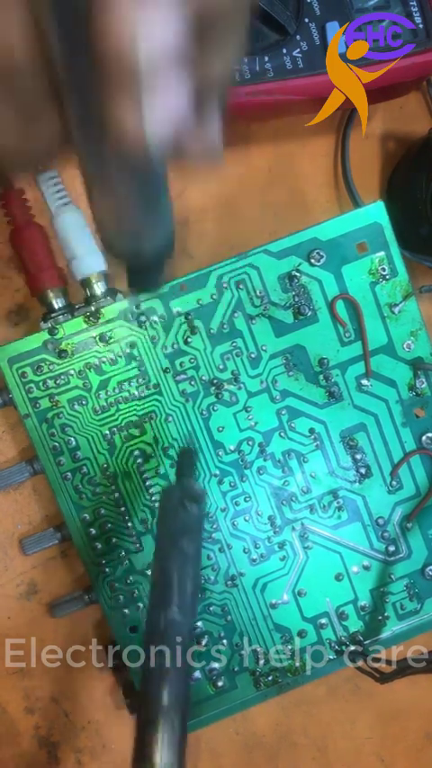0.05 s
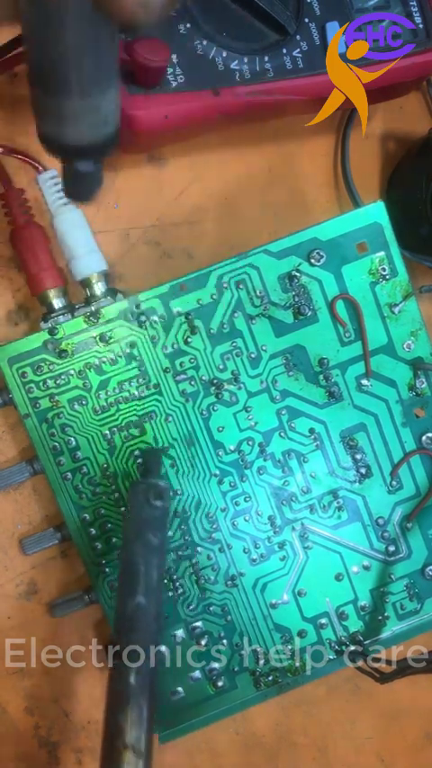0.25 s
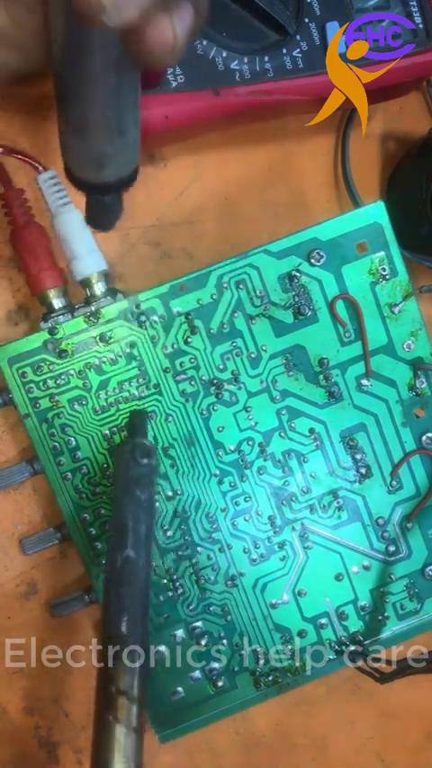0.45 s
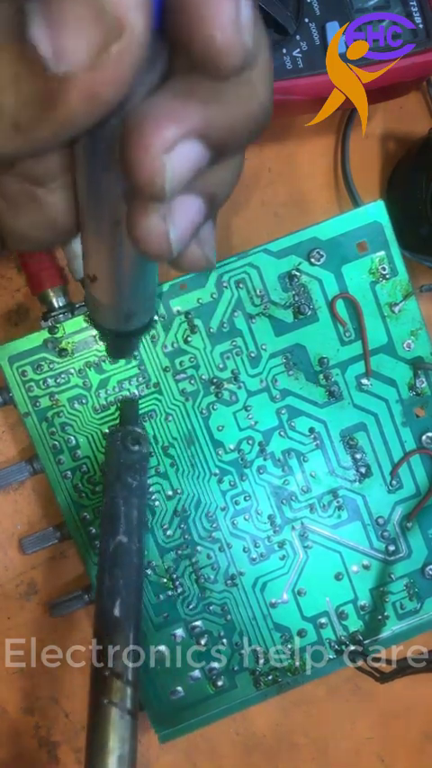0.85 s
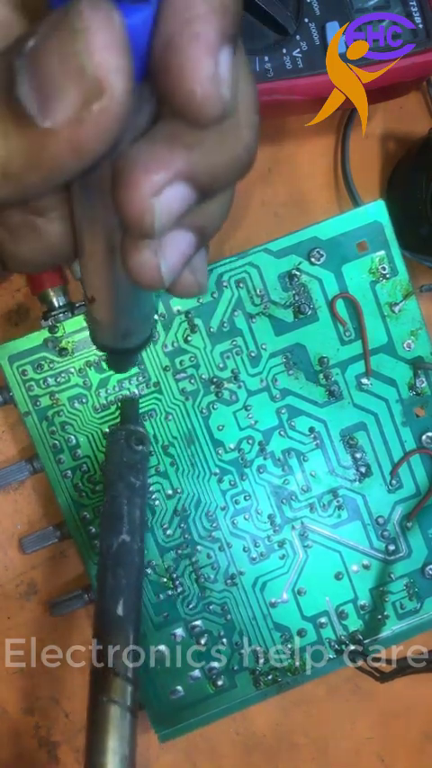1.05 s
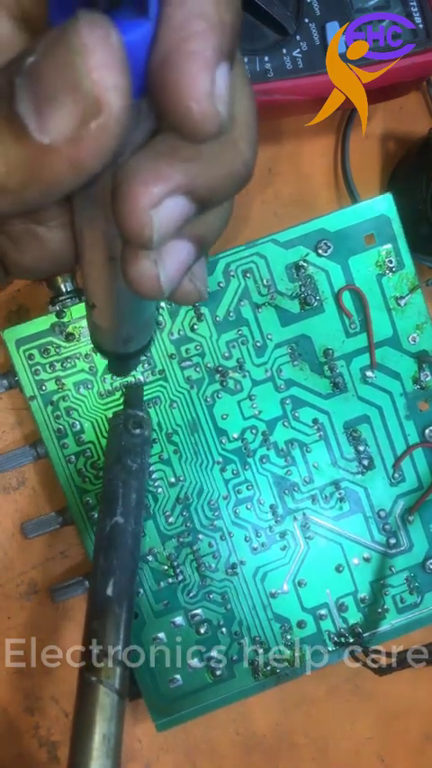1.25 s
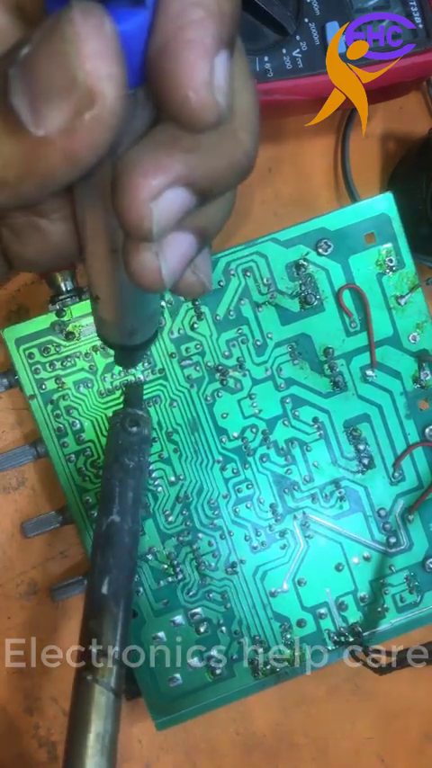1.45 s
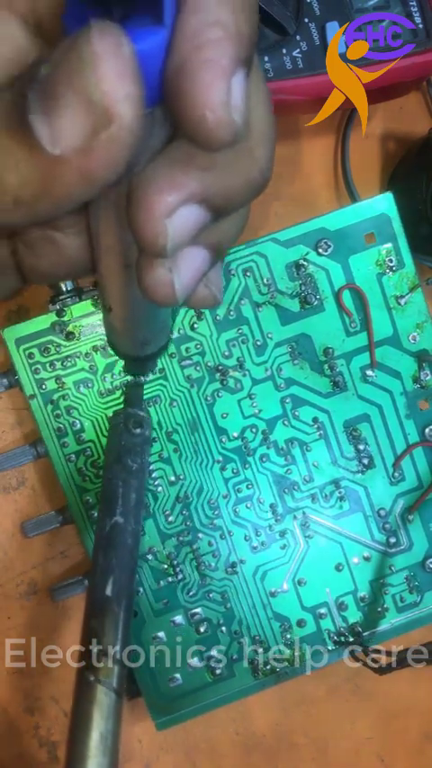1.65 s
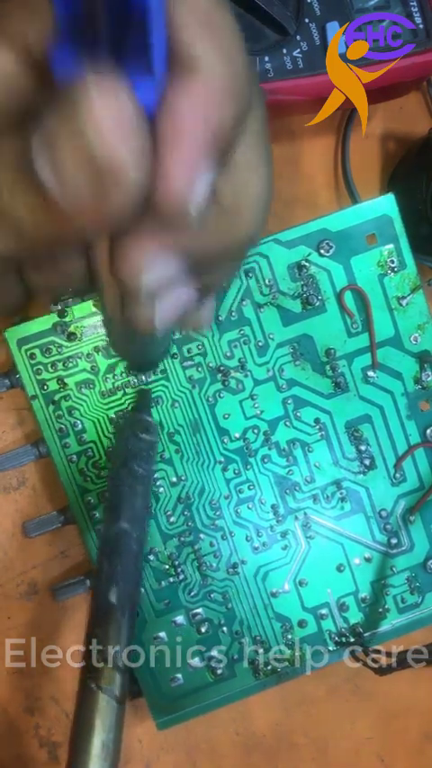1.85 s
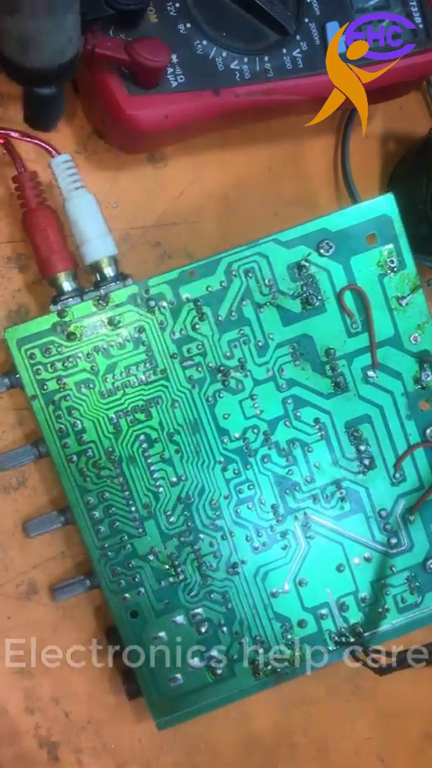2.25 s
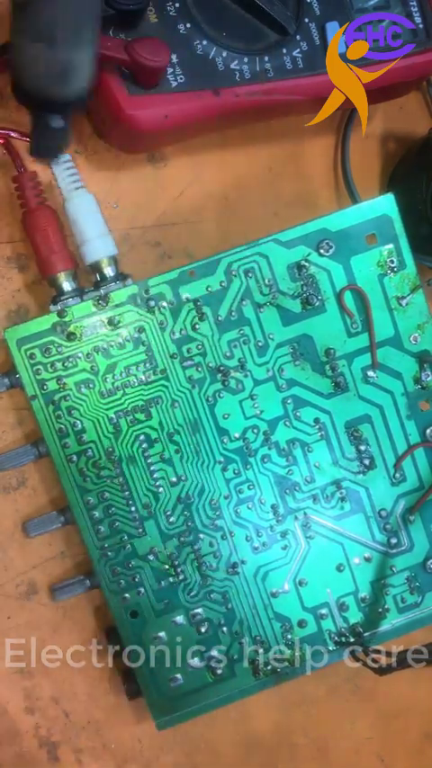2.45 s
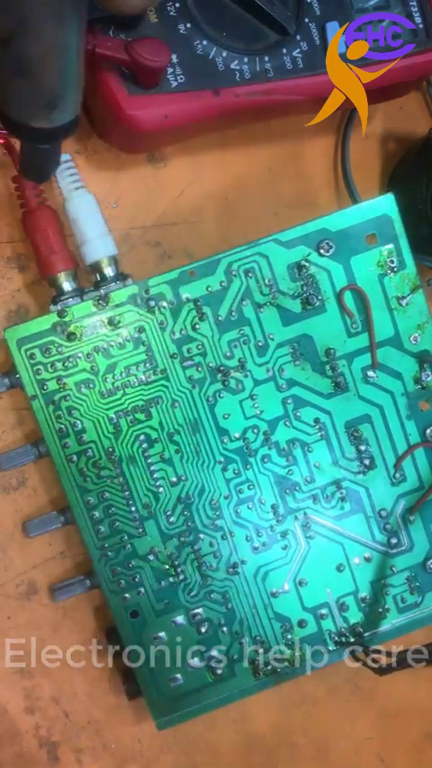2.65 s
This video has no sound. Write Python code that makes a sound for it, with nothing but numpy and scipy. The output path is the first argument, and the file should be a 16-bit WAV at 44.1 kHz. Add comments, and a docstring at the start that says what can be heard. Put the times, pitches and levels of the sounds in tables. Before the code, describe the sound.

Two sharp clacks of a desoldering pump on a bench, over faint room noise.

```python
"""Faint, dull room noise in a small workshop, then sharp clicks close to the microphone: a spring-loaded
desoldering pump is cocked against the workbench. Plunger and catch snap, the spring rattles, the plunger
scrapes along the barrel, and each blow rings and thumps the bench top. Fingers shift their grip, and
two seconds later the pump is knocked on the bench again. The recorder's automatic gain lifts the
background after the blows; its gate briefly ducks it, then shuts it off."""
import sys
import numpy as np
from scipy import signal
from scipy.fft import rfft, irfft
from scipy.io import wavfile
from scipy.ndimage import uniform_filter1d

SR = 44100
rng = np.random.default_rng(int(sys.argv[2]) if len(sys.argv) > 2 else 0)


def master_out(mix):
    """Clip the mix to full scale and print it as 16-bit PCM to the path in sys.argv[1]."""
    frames = np.transpose(np.atleast_2d(mix))
    ceiling = np.clip(frames, -1, 1)
    pcm = np.round(ceiling * 32767).astype(np.int16)
    wavfile.write(sys.argv[1], SR, pcm)


N = 123479
T = np.arange(N) / SR
BINS_HZ = np.maximum(np.fft.rfftfreq(N, 1 / SR), 1)


def undb(db):
    """Decibels to gain."""
    return 10 ** (np.asarray(db) / 20)


def unit(x):
    """Scale to rms 1."""
    return x / np.sqrt(np.mean(x ** 2))


def curve(points):
    """Gain over time from (time_s, level_db) points."""
    return undb(np.interp(T, *np.array(points).T))


def colour(points, tilt_db=0, pivot_hz=2800):
    """Gain per bin from (frequency_hz, level_db) points, the treble tilted by tilt_db per octave."""
    hz, db = np.array(points).T
    shape_db = np.interp(np.log2(BINS_HZ), np.log2(hz), db)
    return undb(shape_db + tilt_db * np.maximum(np.log2(BINS_HZ / pivot_hz), -.5))


def band(hz, octaves):
    """Bell-shaped gain per frequency bin."""
    return np.exp(-.5 * (np.log2(BINS_HZ / hz) / octaves) ** 2)


def noise(gain):
    """Noise of a given colour, rms 1."""
    return unit(irfft(rfft(rng.standard_normal(N)) * gain, N))


def wander(per_s):
    """Glide between random values, per_s of them a second; spread near 1."""
    hold = int(SR / per_s)
    steps = np.repeat(rng.standard_normal(N // hold + 1), hold)
    return 1.2 * uniform_filter1d(steps, hold)[:N]


def impulse(gain):
    """The shortest causal click of a given colour, peak 1."""
    cepstrum = irfft(np.log(gain), N)
    cepstrum[1:] *= 2 * (np.arange(1, N) < N / 2)  # minimum phase
    click = irfft(np.exp(rfft(cepstrum)), N)
    return click / np.abs(click).max()


def fade(t60):
    """Exponential decay, 60 dB in t60 seconds."""
    return np.exp(-np.minimum(np.log(1000) * T / t60, 40))


def ring(modes):
    """A tenth of the scene's length of decaying (pitch_hz, level_db, t60_s) modes, then silence."""
    t = T[:N // 10]
    tones = sum(undb(db) * np.sin(2 * np.pi * hz * t) * np.exp(-np.log(1000) * t / t60)
                for hz, db, t60 in modes)
    return np.pad(tones, (0, N - len(t)))


def add(out, start_s, sound):
    """Mix a sound in from a given time."""
    start = int(start_s * SR)
    out[start:] += sound[:N - start]


def suppressor_patches(x, depth, swing_db=6):
    """A noise suppressor's trace: narrow bands swell and sink at random, by depth (0-1 over time)."""
    _, frames_s, cells = signal.stft(x, SR, nperseg=1024)
    chance = uniform_filter1d(rng.standard_normal(cells.shape), size=4, axis=0)
    chance = unit(uniform_filter1d(chance, size=2, axis=1))
    gain = undb(swing_db * np.interp(frames_s, T, depth) * np.minimum(chance, 1))
    gain /= np.sqrt(np.mean(gain ** 2, axis=0))
    return signal.istft(cells * gain, SR)[1][:N]


# spectrum of the room behind the bench: frequency_hz, level_db
ROOM_SPECTRUM = [(24, -54), (40, -26.5), (96, -6.5), (168, -1), (490, -7), (675, -14), (1100, -8.5),
                 (1320, -16), (1810, -17.5), (2710, -27), (6490, -42), (7600, -50.5), (8300, -80)]
# background as the recorder's automatic gain lifts it and its gate finally shuts: time_s, level_db
RECORDER_GAIN = [(0, -54.5), (.22, -52), (.44, -45.5), (.7, -50), (1.0, -55), (1.42, -54.5), (1.6, -52.5),
                 (1.72, -54), (2.21, -55), (2.3, -49), (2.62, -49.5), (2.638, -80)]
# brief drop-outs of the gate: start_s, end_s, gain_db
GATE_DROPOUTS = [(0.343, 0.425, -15), (2.214, 2.25, -29), (2.474, 2.506, -31), (2.519, 2.548, -13)]
# treble let through by the noise suppressor: time_s, gain_db
SUPPRESSOR_TREBLE = [(.3, -1.5), (.39, -18.5), (.55, -1.5), (2.2, 1), (2.36, -17), (2.46, -1.5),
                     (2.54, -11.5)]


def room_noise(treble_hz=3640, flicker_db=2.5, flicker_per_s=23, gate_edge_s=.0087):
    """A dull room rush; a noise suppressor dulls its treble and leaves watery patches after the blows."""
    spectrum = rfft(noise(colour(ROOM_SPECTRUM)))
    rush = np.zeros(N)
    for hz in 30 * 2 ** np.arange(0, 9, .5):  # half-octave bands
        flicker = undb(flicker_db * wander(flicker_per_s) / (1 + (hz / treble_hz) ** 2))
        rush += irfft(spectrum * band(hz, octaves=.25), N) * flicker
    rush = unit(rush)
    low = signal.sosfiltfilt(signal.butter(6, treble_hz, fs=SR, output="sos"), rush)
    treble = curve(SUPPRESSOR_TREBLE)
    rush = suppressor_patches(low + (rush - low) * treble, depth=np.clip(1 - treble, 0, 1))
    gate_db = sum(db * np.clip(np.minimum(T - start, end - T) / gate_edge_s, 0, 1)
                  for start, end, db in GATE_DROPOUTS)
    return rush * curve(RECORDER_GAIN) * undb(gate_db)


# modes of the pump barrel: pitch_hz, level_db, t60_s
BARREL_MODES = [(2800, -4.5, 0.038), (2950, -1.5, 0.03), (3210, -1.5, 0.035), (3350, -5.5, 0.035),
                (4330, -4.5, 0.052), (4980, -13, 0.062), (6340, -15, .05)]
# spectrum of one snap: frequency_hz, level_db
SNAP_SPECTRUM = [(200, -18), (1100, -15), (2000, -22), (2450, -9), (2950, 1), (3500, -3), (4400, -15.5),
                 (5800, -25), (6900, -22), (7650, -26.5), (9300, -62.5)]
# resonances of the tube, heard in every rattle and scrape: frequency_hz, level_db
TUBE_SPECTRUM = [(300, -16.5), (1100, -11), (2100, -23), (2500, -9), (2870, 1.5), (3130, 3), (3550, -8.5),
                 (3950, -8.5), (4300, -1.5), (4680, -19), (5030, -6.5), (5950, -29.5), (6420, -12.5),
                 (6950, -25), (7650, -28.5), (9300, -67)]
# contacts close to the microphone: start_s, snap_db, rattle_db, rattle_t60_s, tilt_db_per_octave
PUMP_CONTACTS = [(0.1467, -44, -55.5, 0.18, 2), (0.1813, -40.5, -55.5, 0.1, 5),
                 (0.2169, -35.5, -48.5, 0.039, 11), (0.2249, -23.5, -29, 0.069, 6),
                 (.2330, -5.5, -27.5, 0.024, -0.5), (0.2417, -24, -33.5, 0.04, 3.5),
                 (0.2489, -23, -33, 0.021, 3), (0.2642, -18.5, -23.5, 0.03145, -7),
                 (0.3222, -24.5, -24.5, 0.016, 9), (0.3321, -25, -32.5, 0.032, 0),
                 (2.2461, -32, -36, .04, -0.5), (2.2534, -4.5, -26.5, 0.044, -3.5),
                 (2.2614, -20, -30, 0.05, -9.5), (2.2698, -26, -36.5, 0.029, -4),
                 (2.2771, -39, -36, 0.078, -4), (2.5070, -36, -55, 0.029, 2.5),
                 (2.5140, -34, -40.5, 0.038, -10), (2.7142, -35, -72, .015, -0.5)]


def pump_clicks(barrel_db=-12.5):
    """Each contact of plunger and catch snaps, rings the barrel and rattles the spring in the tube."""
    out = np.zeros(N)
    barrel = undb(barrel_db) * ring(BARREL_MODES)  # level relative to the rattle
    for start, snap_db, rattle_db, t60, tilt_db in PUMP_CONTACTS:
        snap = impulse(colour(SNAP_SPECTRUM, tilt_db))
        rattle = noise(colour(TUBE_SPECTRUM, tilt_db)) * fade(t60)
        add(out, start, undb(snap_db) * snap + undb(rattle_db) * (rattle + barrel))
    return out


# modes of the bench top: pitch_hz, level_db, t60_s
BENCH_MODES = [(186, 2, 0.051), (265, 3, .05), (394, 3.5, 0.04), (609, -2, 0.038), (816, -6.5, 0.085),
               (908, -8.5, 0.059), (1109, 0, 0.058), (1167, -7, 0.055), (1490, -5, 0.078),
               (1727, -6, 0.076), (1889, -8, 0.094)]
# blows on the bench, close by: start_s, level_db, centre_hz, spread_octaves, ring_time_factor
BENCH_BLOWS = [(0.18, -31, 876, 0.46, 2.55), (0.2343, -15.5, 398, 0.68, 1.04),
               (0.2424, -17.5, 647, 1.2, 0.33), (0.2632, -15, 916.5, 0.86, 0.44),
               (0.3231, -18.5, 810, 0.76, 0.67), (2.2470, -33, 1313, 1.7, .9),
               (2.2540, -12.5, 301.5, 1.9, 1.06), (2.2756, -20, 1434, 0.72, 0.6),
               (2.5115, -26.5, 615, 0.19, 0.97), (2.515, -32, 1105, 0.13, 0.44),
               (2.583, -42, 740, .2, 0.93), (2.7151, -44, 375, 1.02, 0.32)]


def bench_knocks(rise_s=.0007, mode_scatter=.0041, clatter_db=-16, clatter_t60_s=.11):
    """Each blow rings the bench modes around its own centre pitch, and things on the bench clatter."""
    out = np.zeros(N)
    top_mode_hz = BENCH_MODES[-1][0]
    for start, db, centre_hz, spread, ring_factor in BENCH_BLOWS:
        def excitation(hz):
            return 1 / (1 + (np.log2(hz / centre_hz) / spread) ** 2) / (1 + (hz / top_mode_hz) ** 4)

        board = np.zeros(N)
        for k, (hz, mode_db, t60) in enumerate(BENCH_MODES):
            detuned_hz = hz * (1 + mode_scatter * rng.standard_normal())
            mode = ring([(detuned_hz, mode_db, t60 * ring_factor)])
            board += (-1) ** k * excitation(hz) * mode  # neighbouring modes move in opposite directions
        clatter = undb(clatter_db) * noise(excitation(BINS_HZ)) * fade(clatter_t60_s * ring_factor)
        attack = 1 - np.exp(-T / rise_s)
        add(out, start, undb(db) * (board / np.abs(board).max() + clatter) * attack)
    # the bench radiates little deep bass
    return signal.sosfilt(signal.butter(2, 107, "high", fs=SR, output="sos"), out)


# soft shoves of the hand on the bench: peak_s, level_db, pitch_hz, half_length_s
HAND_SHOVES = [(.2420, -16.5, 185, 0.0052), (.2430, -20, 398, 0.0055), (.2460, -32.5, 90, 0.0066),
               (.3295, -13, 235, 0.0041), (.3290, -27, 98, 0.0054), (2.2620, -17.5, 194, 0.005),
               (2.2600, -24, 270, 0.0025), (2.5140, -24.5, 253, 0.0024)]


def bench_thumps():
    """A shove bends the bench top back and forth for a few cycles."""
    return sum(undb(db) * np.cos(2 * np.pi * hz * (T - peak)) * np.exp(-.5 * ((T - peak) / half) ** 2)
               for peak, db, hz, half in HAND_SHOVES)


# strokes of the plunger: peak_s, level_db, rise_s, fall_s, tilt_db_per_octave
PLUNGER_STROKES = [(0.2631, -30.5, .002, .003, -2.5), (.2940, -45.5, .005, 0.0057, -8.5),
                   (0.321, -25.5, 0.0062, 0.0043, 3.5), (0.347, -37.5, .012, .0012, -5.5),
                   (2.2515, -27.5, 0.0033, 0.0023, -6.5)]


def plunger_slides(grit_db=.5, grit_per_s=680, ring_db=-11.5):
    """The plunger scrapes along in short jerks and sets the barrel ringing."""
    scrape = np.zeros(N)
    for peak, db, rise, fall, tilt_db in PLUNGER_STROKES:
        swell = np.exp(np.minimum((T - peak) / rise, (peak - T) / fall))
        scrape += undb(db) * swell * noise(colour(TUBE_SPECTRUM, tilt_db))
    scrape *= unit(undb(grit_db * wander(grit_per_s)))  # slight stick and slip
    barrel = signal.fftconvolve(scrape, ring(BARREL_MODES))[:N]
    return scrape + undb(ring_db) * unit(barrel) * scrape.std()


# fingers on pump and bench, close by: peak_s, level_db, half_length_s, centre_hz
GRIP_SHIFTS = [(0.468, -54, 0.027, 426), (1.527, -53.5, 0.06, 143.6), (1.599, -54.5, 0.043, 368)]


def finger_rubs():
    """Fingers shift their grip with a soft, dull rustle."""
    return sum(undb(db) * np.exp(-.5 * ((T - peak) / half) ** 2) * noise(band(hz, octaves=.53))
               for peak, db, half, hz in GRIP_SHIFTS)


def workshop_echo(x, level_db=-37.5, t60_s=.38, cutoff_hz=1820):
    """The small workshop returns a faint, dull reverberation to the microphone."""
    lowpass = signal.butter(2, cutoff_hz, fs=SR, output="sos")
    tail = signal.sosfilt(lowpass, rng.standard_normal(N)) * fade(t60_s)
    return undb(level_db) * signal.fftconvolve(x, tail / np.linalg.norm(tail))[:N]


def scene():
    """One microphone close to pump and bench, the room behind."""
    close = pump_clicks() + bench_knocks() + bench_thumps() + plunger_slides() + finger_rubs()
    return (room_noise() + close + workshop_echo(close))[None]


def record(dry):
    """The recorder cuts off steeply above 8.8 kHz."""
    return signal.sosfilt(signal.ellip(8, .2, 70, 8800, fs=SR, output="sos"), dry)


dry = scene()
out = record(dry)
master_out(out)
```